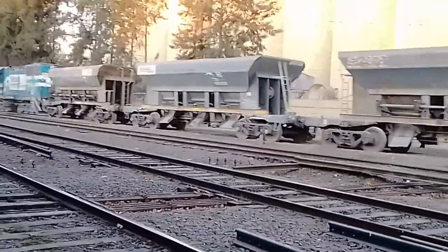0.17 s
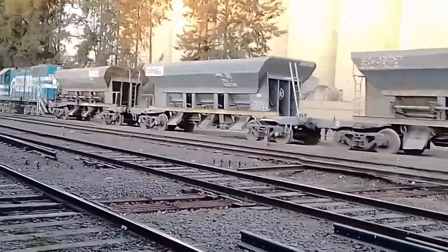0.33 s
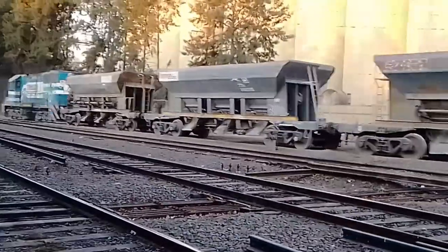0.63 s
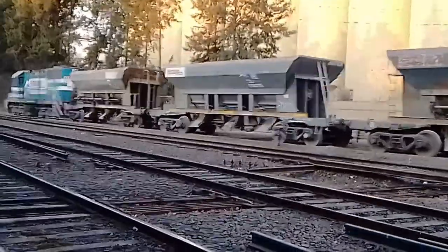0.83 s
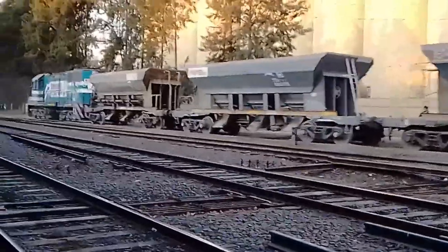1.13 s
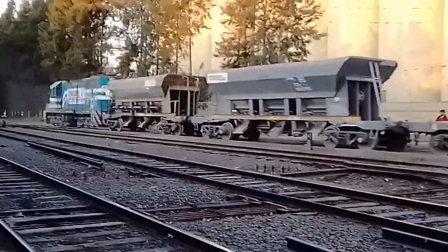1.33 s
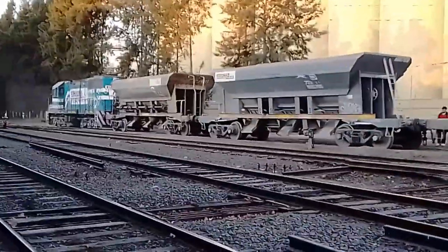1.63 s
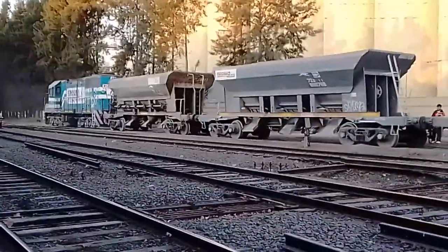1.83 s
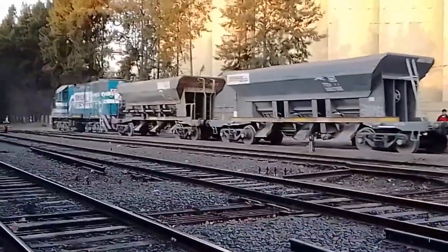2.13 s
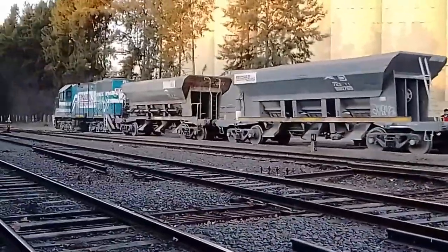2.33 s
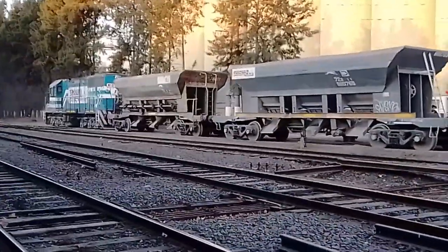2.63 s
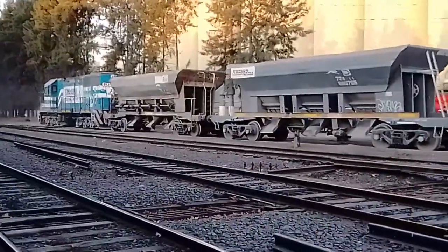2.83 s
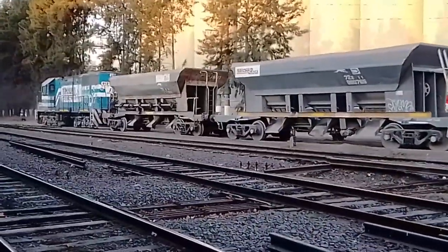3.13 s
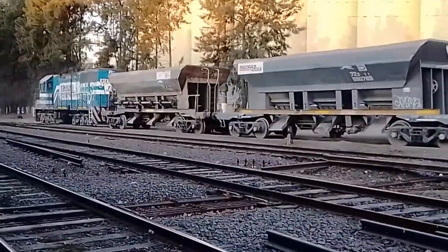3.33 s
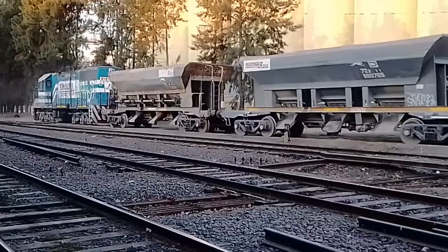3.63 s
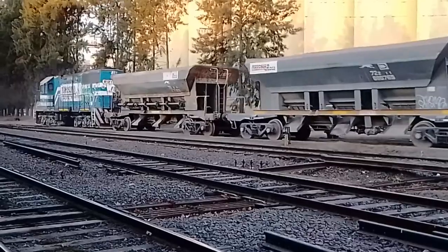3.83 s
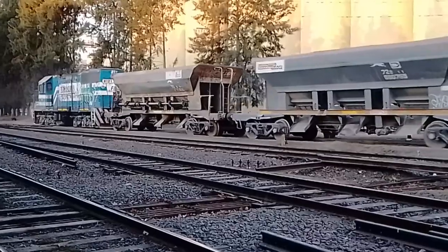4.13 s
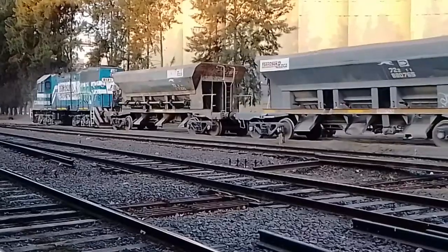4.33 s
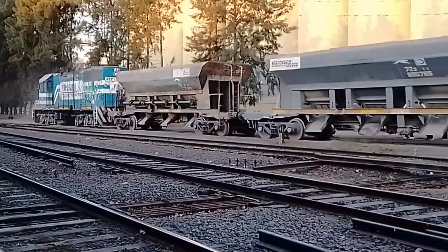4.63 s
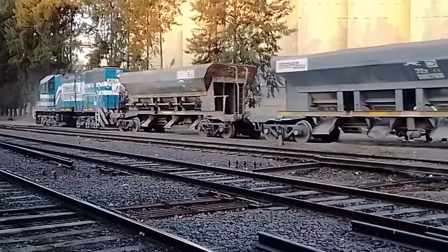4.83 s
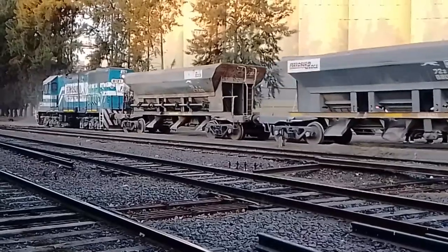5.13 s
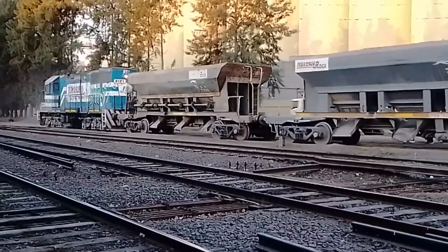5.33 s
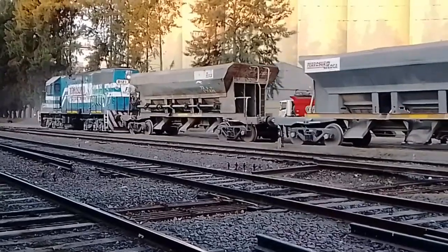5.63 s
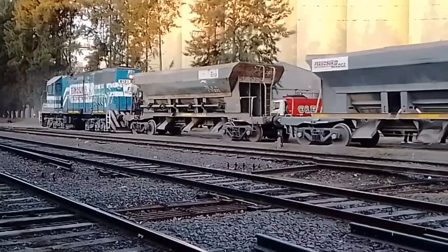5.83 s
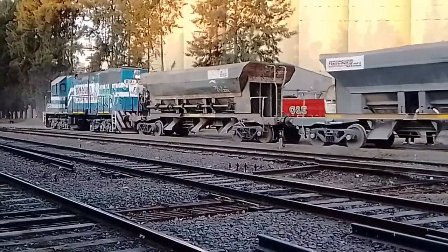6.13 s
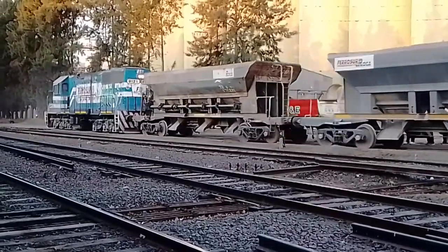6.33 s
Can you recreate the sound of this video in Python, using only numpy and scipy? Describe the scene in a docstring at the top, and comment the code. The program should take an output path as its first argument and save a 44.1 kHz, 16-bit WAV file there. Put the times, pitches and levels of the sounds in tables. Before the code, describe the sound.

A diesel freight train rolls slowly by with a dull rumble, hissing wheels and two high squeals, while birds chirp.

```python
"""Slow freight in a yard

A diesel locomotive draws hopper cars past concrete silos and trees. Exhaust and heavy cars blur into
a dull rumble that swells and sinks over the hiss of rolling wheels. Twice a flange rubs the rail and
stick-slip makes a wheel squeal. The running gear pings, clanks and scuffs; grit ticks under the wheels.
Birds whistle in falling slurs, echoed by the yard."""
import sys
import numpy as np
from scipy import signal
from scipy.fft import rfft, irfft, next_fast_len
from scipy.io import wavfile
from scipy.ndimage import uniform_filter1d

SR = 44100
rng = np.random.default_rng(int(sys.argv[2]) if len(sys.argv) > 2 else 0)


def wav_out(sig):
    """Save sig, one row per channel (or a flat mono array), as 16-bit PCM at SR to the path in sys.argv[1]."""
    wavfile.write(sys.argv[1], SR, np.round(np.clip(np.atleast_2d(sig).T, -1, 1) * 32767).astype(np.int16))


N = 286194
TIME = np.arange(N) / SR


def rumble(split_hz=105, exhaust_hz=167.8, throb_db=1.0, throb_hz=8):
    """Distant exhaust and heavy cars: a dull, unevenly throbbing rumble in two bands."""
    # rumble envelope: t/s, deep level/dB, upper level/dB
    levels = [(0, -33, -34), (0.42, -30, -34), (0.72, -42, -37), (1.02, -42, -39.5), (1.22, -33.0, -32.5),
              (1.45, -33.0, -28.5), (1.69, -36.5, -28.5), (1.77, -35, -36.5), (2.05, -41.5, -38),
              (2.3, -32, -35), (2.62, -38, -34.5), (2.9, -43.5, -41.5), (2.98, -39, -28),
              (3.36, -28.5, -28), (3.44, -39, -39.5), (3.55, -31, -34), (3.68, -42.5, -41.5),
              (3.8, -39.5, -35.5), (3.95, -33, -28.0), (4.52, -33, -28.5), (4.92, -33.5, -33.5),
              (5.06, -32, -27), (5.28, -38.5, -29), (5.5, -38.5, -35), (5.75, -32.5, -33.0),
              (6.05, -36.5, -36.5), (6.17, -35, -29), (6.49, -32.5, -29.5)]
    # rumble spectrum: f/Hz, level/dB
    colour = [(13, -47), (22, -23), (76, 0.5), (167, 3), (189, -1), (232, -17), (291, -34.5), (330, -17),
              (430, -57), (730, -120)]
    deep_db, upper_db = in_time(levels)
    low = noise(colour, flicker_db=0.5)
    deep = signal.sosfiltfilt(signal.butter(4, split_hz, fs=SR, output="sos"), low)
    exhaust = from_db(-9) * tone(exhaust_hz, width_hz=6.6, rough=0.88)
    upper = from_db(upper_db - 4) * evened(rms_one(low - deep) + exhaust, window_s=0.099)
    deep = from_db(deep_db - 4.35) * evened(deep, window_s=0.13)
    return from_db(throb_db * drift(throb_hz)) * (deep + upper)


def rolling():
    """Car bodies drone, wheels roar and sing, and rail hiss rings through one wheel after another."""
    # car body envelope: t/s, level/dB
    body_levels = [(0, -45), (0.3, -44), (0.7, -47), (1.8, -48), (3.05, -47), (3.15, -44), (3.25, -46.5),
                   (4.5, -47.5), (4.9, -47), (6.49, -47)]
    # rolling envelope: t/s, roar level/dB, hiss level/dB
    rolling_levels = [(0.0, -49.5, -54), (0.47, -52, -58.5), (2.76, -51.5, -57), (3.16, -49.5, -58),
                      (3.52, -51.5, -54), (3.9, -47, -59), (4.05, -48, -45.5), (4.41, -51.5, -56),
                      (5.22, -51.5, -57), (6.49, -50, -51)]
    # spectra of car bodies, wheel roar, rail hiss and high sizzle: f/Hz, level/dB
    body_colour = [(200, -9), (300, -1.5), (390, 2), (480, -5.5), (590, -9), (820, -2.5), (1000, -8.5),
                   (1200, -6), (1700, -12), (2400, -47)]
    roar_colour = [(1200, -9.5), (1900, -3), (2400, 1), (3200, -7), (4200, 0.5), (5000, -24), (6500, -14.5)]
    hiss_colour = [(4000, 7.5), (5200, 4.5), (6300, -7.5), (7800, 10.5), (9200, -10), (10500, -8)]
    sizzle_colour = [(8500, -4.5), (10000, 6), (11500, -6), (13300, -4), (15500, -4)]
    # brief bursts of high sizzle: t/s, level/dB
    sizzle_bursts = [(0.02, -61), (0.50, -62), (0.98, -59), (1.41, -64.5), (1.71, -58), (2.04, -61),
                     (2.17, -67), (2.46, -63), (3.22, -61), (4.42, -74), (4.73, -63), (5.34, -69),
                     (5.57, -71), (5.71, -62), (6.10, -59), (6.22, -65), (6.45, -61)]
    # faint, sustained wheel tones: f/Hz, level/dB
    wheel_tones = [(2363, -64), (2990, -66.5), (4005, -67), (5545, -78), (7704, -77), (7880, -72.5),
                   (8091, -77), (9071, -74.5)]
    body_db, = in_time(body_levels)
    roar_db, hiss_db = in_time(rolling_levels)
    body = from_db(body_db - 2.5) * noise(body_colour, flicker_db=1.2)
    roar = from_db(roar_db + 0.14) * noise(roar_colour, flicker_db=1.56)
    bursts = sum(from_db(db) * swell(s, rise_s=0.0073, fall_s=0.13) for s, db in sizzle_bursts)
    sizzle = np.hypot(from_db(-67), bursts) * noise(sizzle_colour, flicker_db=1.8)  # floor + bursts
    hiss = from_db(hiss_db - 1.1) * noise(hiss_colour, flicker_db=2)
    contact = hiss + from_db(1) * sizzle
    crossfade_rad = 0.9 * np.pi * TIME + 0.5 * drift(0.89)
    shares = np.sin(crossfade_rad) ** 2, np.cos(crossfade_rad) ** 2
    wheels = sum(share * steel(contact, width_hz=16, floor_db=-14, count=150) for share in shares)
    singing = sum(from_db(db - 1.5 + 3.7 * drift(3.9)) * tone(hz, width_hz=33, rough=0.67)
                  for hz, db in wheel_tones)
    return body + roar + np.std(contact) * wheels + singing


def squeals():
    """The flanges of two wheels rub the rail in turn."""
    # modes of each wheel: f/Hz, level/dB, peak t/s
    near_modes = [(1500, -55, 4.07), (1700, -49, 3.87), (1887, -44, 4.03), (2810, -43, 4.02),
                  (2991, -45, 3.99), (3122, -48, 4.11), (3659, -50, 4.05), (3775, -40.5, 4.02),
                  (3861, -42.5, 4.03), (4356, -46, 4.13), (4619, -51, 4.14), (4785, -45, 4.13),
                  (5146, -47, 3.91), (5560, -57, 4.03), (5830, -53, 4.0), (6072, -47, 4.02),
                  (6874, -52, 4.06), (7429, -52, 3.97), (8420, -46, 4.04), (8872, -55, 3.98),
                  (9220, -51, 3.97), (9469, -52.5, 3.98), (9590, -61, 4.0), (10761, -60, 3.90),
                  (12543, -58, 3.98), (12785, -50.5, 3.98), (12958, -55, 3.98), (13450, -51, 3.94),
                  (13900, -55, 3.94), (14260, -57, 3.96), (15154, -58, 4.03)]
    next_modes = [(1755, -47.5, 6.20), (1840, -45.5, 6.18), (2640, -54, 6.22), (3130, -44, 8.1),
                  (3480, -61, 6.33), (3684, -47.5, 6.24), (4340, -54, 6.24), (4520, -53, 6.26),
                  (5540, -54.5, 6.18), (5730, -59, 6.25), (7360, -53.5, 6.14), (8450, -58, 6.28),
                  (8900, -62, 6.19), (12290, -64, 6.22), (14045, -68, 6.22)]
    near = squeal(near_modes, touch_s=3.83, ring_s=0.16, rough=0.57, width_share=0.0037, skirt_db=-4)
    following = squeal(next_modes, touch_s=6.1, ring_s=0.12, rough=0.77, width_share=0.0042, skirt_db=1)
    return from_db(-1.5) * near + from_db(-2.5) * following


def squeal(modes, touch_s, ring_s, rough, width_share, skirt_db):
    """Stick-slip at the flange feeds the wheel's modes; each builds up, wavers and rings out."""
    longest_ring_hz, spread_oct, grip_s = 5200, 2.04, 0.01
    out = 0
    for hz, db, peak_s in modes:
        rise_s = 0.66 * max(peak_s - touch_s, 0.01)
        fall_s = ring_s * np.exp(-(np.log2(hz / longest_ring_hz) / spread_oct) ** 2)
        out += from_db(db) * swell(peak_s, rise_s, fall_s) * mode(hz, rough, width_share, skirt_db)
    grip = np.clip((TIME - touch_s) / grip_s, 0, 1)
    return grip * out


def grinding():
    """The sliding flange also wakes the many weaker modes of wheel and rail."""
    # flange rubs: t/s, level/dB, rise/s, fall/s
    rubs = [(3.97, -52, 0.099, 0.13), (4.13, -52.5, 0.076, 0.31), (6.25, -53.5, 0.13, 0.11)]
    # grinding spectrum: f/Hz, level/dB
    colour = [(1100, -25), (1500, 8), (2300, -12), (3000, 0), (3900, 4), (5600, -11), (8800, -6),
              (11000, -35), (13500, -9), (15500, -17)]
    envelope = sum(from_db(db) * swell(s, rise_s, fall_s) for s, db, rise_s, fall_s in rubs)
    return envelope * steel(noise(colour, flicker_db=3), width_hz=18, floor_db=-16, count=110)


def pings(rise_s=0.023):
    """Single wheel modes, rubbed into brief ringing."""
    # rubbed modes: t/s, f/Hz, level/dB, fall/s
    rings = [(0.16, 2330, -55, .25), (1.43, 8100, -57, .045), (2.51, 7720, -53, .025),
             (2.65, 2370, -55, .055), (4.19, 6072, -49, .09), (4.20, 3740, -48, .17),
             (4.36, 8880, -62, .06), (4.40, 5560, -62, .25), (4.73, 6500, -58, .04), (5.35, 5600, -61, .06),
             (6.24, 5640, -50, .08)]
    return sum(from_db(db) * swell(s, rise_s, fall_s) * mode(hz, 0.42, width_share=0.0029, skirt_db=-5)
               for s, hz, db, fall_s in rings)


def clank(peak_s=2.935):
    """Loose steel knocks once and rings with a rasp."""
    # modes of the loose part: f/Hz, level/dB
    modes = [(2750, -54.5), (3380, -54), (3840, -56), (4190, -54)]
    ring = sum(from_db(db) * mode(hz, rough=0.63, width_share=0.01, skirt_db=4) for hz, db in modes)
    return swell(peak_s, rise_s=0.022, fall_s=0.17) * ring


def grit():
    """Grit cracks under the wheels in sharp ticks."""
    # cracks: t/s, level/dB
    ticks = [(0.923, -46.5), (2.625, -48), (5.559, -51), (5.587, -45.5)]
    # tick spectrum: f/Hz, level/dB
    colour = [(3000, -20), (6500, -3), (8200, 0), (10500, -11), (15000, -13)]
    return sum(from_db(db) * swell(s, rise_s=0.0011, fall_s=0.0078) for s, db in ticks) * noise(colour)


def scuffs():
    """Steel brushes steel in the running gear and rings softly."""
    # contacts: t/s, level/dB
    contacts = [(.806, -44), (1.09, -46.5), (1.72, -51), (2.92, -50), (4.73, -47)]
    # scuff spectrum: f/Hz, level/dB
    colour = [(900, -3), (2000, 1.5), (2900, 5.5), (4500, -1), (8000, -6), (10000, -20), (15000, -28)]
    envelope = sum(from_db(db) * swell(s, rise_s=0.018, fall_s=0.045) for s, db in contacts)
    return envelope * steel(noise(colour), width_hz=18, floor_db=-7, count=60)


def birds(rasp_hz=130):
    """Sinking slurs and hoarse, plunging chirps from the trees."""
    # slurred whistles: t/s, length/s, start f/Hz, fall/(oct/s), level/dB
    slur_notes = [(0.436, 0.16, 3580, 1.5, -48.5), (0.874, 0.036, 4250, 1.5, -46.5),
                  (1.056, 0.13, 4275, 0.7, -45.5), (1.12, .15, 4003, 0.96, -33),
                  (1.244, 0.072, 3764, 3, -39), (1.233, 0.16, 3960, 1.6, -48),
                  (1.359, 0.15, 3110, 0.9, -49), (1.39, 0.16, 3570, 0.7, -47.5),
                  (1.951, 0.2, 4370, 1.4, -44.5), (2.067, 0.13, 3840, 1.4, -50),
                  (3.168, 0.079, 4550, 1.5, -50), (3.336, .12, 3500, 1.2, -47.5),
                  (4.613, 0.073, 4940, 3, -52), (4.935, 0.12, 3540, 0.5, -54),
                  (5.326, .068, 3540, 1, -41.5), (5.358, 0.14, 3410, 1.6, -47.5),
                  (5.42, .064, 4420, 4, -50), (5.952, 0.078, 3460, 1.5, -50),
                  (6.385, 0.096, 3250, 0.3, -56)]
    # chirps: t/s, level/dB
    chirp_notes = [(0.444, -49.5), (4.76, -47.5)]
    flutter = drift(rasp_hz) + 1j * drift(rasp_hz)
    slurs = sum(from_db(db) * whistle(s, length_s, hz, fall, flutter, hoarse=0.32)
                for s, length_s, hz, fall, db in slur_notes)
    chirps = sum(from_db(db) * whistle(s, 0.045, 7030, 16.5, flutter, hoarse=1) for s, db in chirp_notes)
    return slurs + chirps


def whistle(start_s, length_s, start_hz, fall_oct_per_s, flutter, hoarse):
    """One falling bird note; hoarseness flutters its amplitude and phase."""
    span = (TIME > start_s) & (TIME < start_s + length_s)
    age_s = TIME[span] - start_s
    phase = 2 * np.pi * np.cumsum(start_hz * 2 ** (-fall_oct_per_s * age_s)) / SR
    voice = np.sqrt(2) * (1 - hoarse) + hoarse * flutter[span]
    arch = np.sqrt(np.abs(np.sin(np.pi * age_s / length_s)))
    out = np.zeros(N)
    out[span] = arch * np.real(voice * np.exp(1j * phase))
    return out


def yard_echo(x, low_t60_s=0.2133, paths=8):
    """Repeating echoes from silo walls and car sides; treble dies sooner."""
    size = next_fast_len(N + SR)
    hz = np.arange(size // 2 + 1) * SR / size
    response = 0
    for k, lag_s in enumerate(rng.uniform(0.019, 0.056, size=paths)):
        loss_db = 60 * lag_s / low_t60_s * (1 + hz / 40500)
        loop = from_db(-loss_db) * np.exp(-2j * np.pi * hz * lag_s)
        response += (-1) ** k * loop / (1 - loop)
    return irfft(rfft(x, size) * response / np.sqrt(paths), size)[:N]


def scatter(x, fade_s=0.026, count=40):
    """Trees and car sides return a spray of early reflections."""
    lags_s = rng.uniform(0.004, 0.07, size=count)
    signs = rng.choice([-1, 1], size=count)
    spray = np.zeros(int(lags_s.max() * SR) + 1)
    spray[(lags_s * SR).astype(int)] = signs * np.exp(-lags_s / fade_s)
    return signal.fftconvolve(x, spray / np.linalg.norm(spray))[:N]


def steel(x, width_hz, floor_db, count):
    """Wheels and frames filter x through narrow resonances of random pitch and strength; rms 1."""
    hz = np.linspace(0, SR / 2, 8192)
    centres_hz = rng.uniform(1210.5, 16000, size=(count, 1))
    strengths = from_db(rng.normal(0, 1.1, size=(count, 1)))
    peaks = np.sum(strengths / (1 + (2 * (hz - centres_hz) / width_hz) ** 2), axis=0)
    local_mean = uniform_filter1d(peaks, size=400) + 1e-12
    gain = np.sqrt(peaks / local_mean + from_db(floor_db) ** 2)
    size = next_fast_len(N)
    bins_hz = np.arange(size // 2 + 1) * SR / size
    return rms_one(irfft(rfft(x, size) * np.interp(bins_hz, hz, gain), size)[:N])


def mode(hz, rough, width_share, skirt_db):
    """One wavering steel mode; the grinding contact spreads a noise skirt around it."""
    return tone(hz, hz * width_share, rough) + from_db(skirt_db) * tone(hz, width_hz=43, rough=1)


def tone(hz, width_hz, rough):
    """Sine of rms 1 with the power share `rough` scattered into a narrow band."""
    phase = 2 * np.pi * (hz * TIME + rng.random())
    in_phase = np.sqrt(2 * (1 - rough)) + np.sqrt(rough) * drift(width_hz)
    quadrature = np.sqrt(rough) * drift(width_hz)
    return in_phase * np.sin(phase) + quadrature * np.cos(phase)


def noise(colour, flicker_db=0):
    """Third-octave noise bands that follow a spectrum, each flickering by itself; rms 1."""
    hz, db = np.transpose(colour)
    edges_hz = 20 * 2 ** (np.arange(30) / 3)
    white = rng.standard_normal((2, N + SR // 2))
    out = 0
    for k, (low, high) in enumerate(zip(edges_hz, edges_hz[1:])):
        if hz[0] < high and low < hz[-1]:
            bandpass = signal.butter(2, [low, high], "band", fs=SR, output="sos")
            band = signal.sosfilt(bandpass, white[k % 2])[-N:]
            band_db = np.interp(np.log(np.sqrt(low * high)), np.log(hz), db)
            out += band * from_db(band_db + flicker_db * drift(6.5))
    return rms_one(out)


def drift(rate_hz, step=20):
    """Random wander of rms 1: noise at SR / step through a double low-pass."""
    pole = np.exp(-2 * np.pi * rate_hz * step / SR)
    white = rng.standard_normal(N // step + 4002)
    slow = signal.lfilter([1], [1, -2 * pole, pole * pole], white)[4000:]
    return np.interp(np.arange(N) / step, np.arange(len(slow)), rms_one(slow))


def swell(peak_s, rise_s, fall_s):
    """Gaussian rise, exponential fall."""
    age_s = TIME - peak_s
    return np.exp(-np.where(age_s < 0, (age_s / rise_s) ** 2, age_s / fall_s))


def evened(x, window_s):
    """Hold the running rms at 1."""
    return x / np.sqrt(uniform_filter1d(x ** 2, int(window_s * SR)) + 1e-12)


def in_time(rows):
    """Each envelope column at every sample."""
    times_s, *columns = np.transpose(rows)
    return [np.interp(TIME, times_s, column) for column in columns]


def rms_one(x):
    return x / np.sqrt(np.mean(np.abs(x) ** 2) + 1e-20)


def from_db(db):
    return 10 ** (np.asarray(db) / 20)


def scene():
    """Train and birds in mono, with echoes on the ringing steel and the calls."""
    ringing = squeals() + pings() + clank() + grinding()
    calls = birds()
    echo = yard_echo(from_db(-22) * ringing + from_db(-1) * calls) + from_db(-10.5) * scatter(calls)
    return (rumble() + rolling() + ringing + grit() + scuffs() + calls + echo)[None]


def record(dry, cutoff_hz=15650):
    """Steep low-pass."""
    return signal.sosfilt(signal.ellip(12, 0.1, 90, cutoff_hz, fs=SR, output="sos"), dry)


dry = scene()
out = record(dry)
wav_out(out)
```